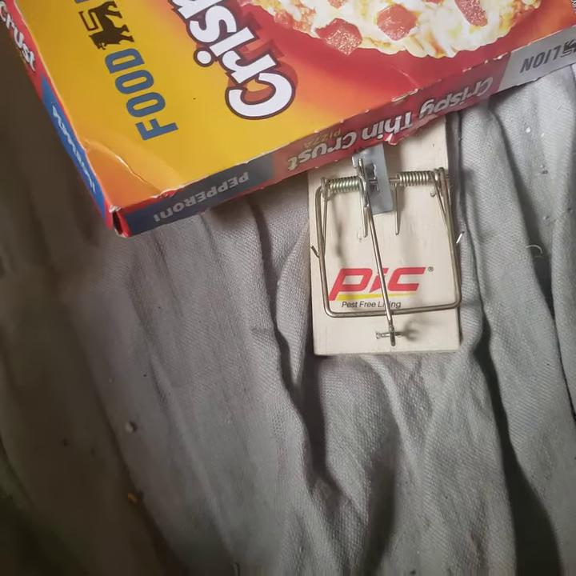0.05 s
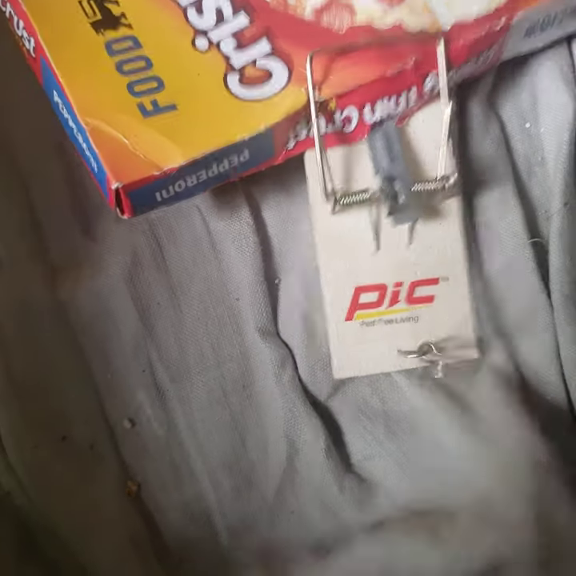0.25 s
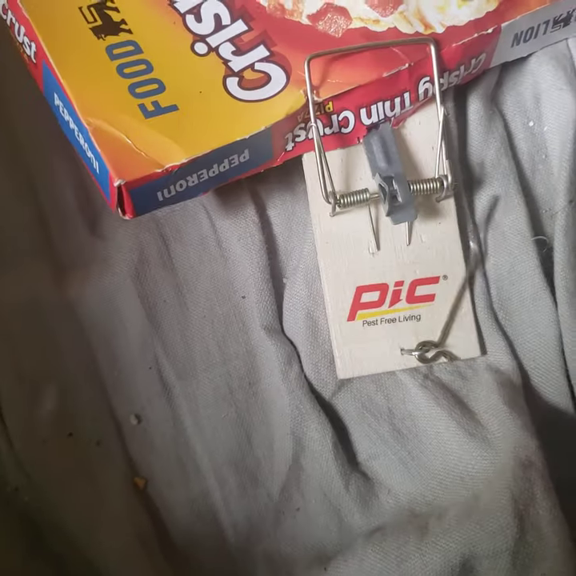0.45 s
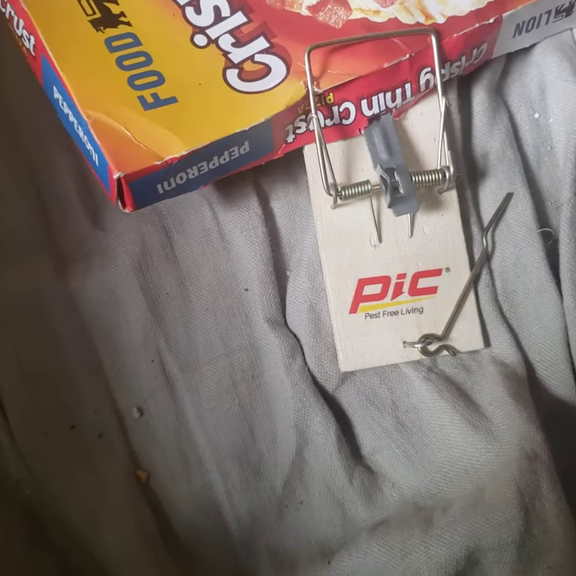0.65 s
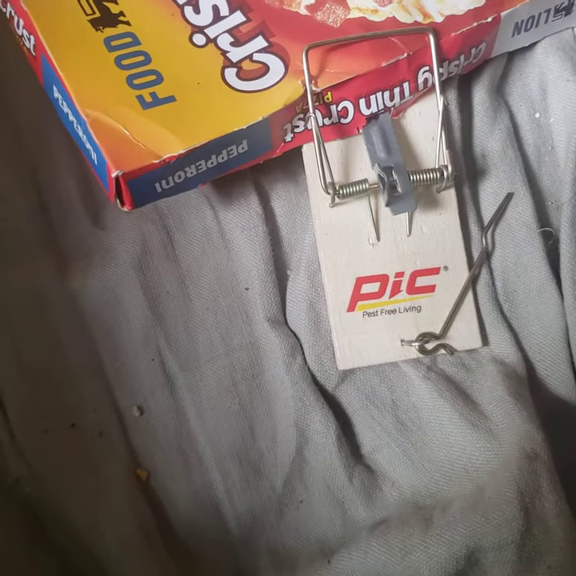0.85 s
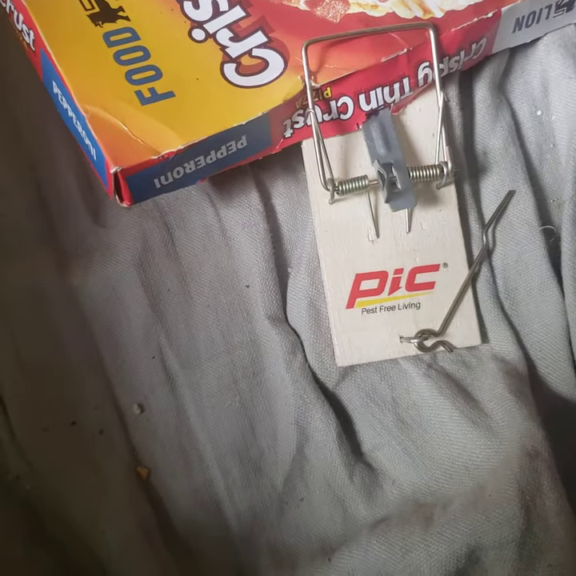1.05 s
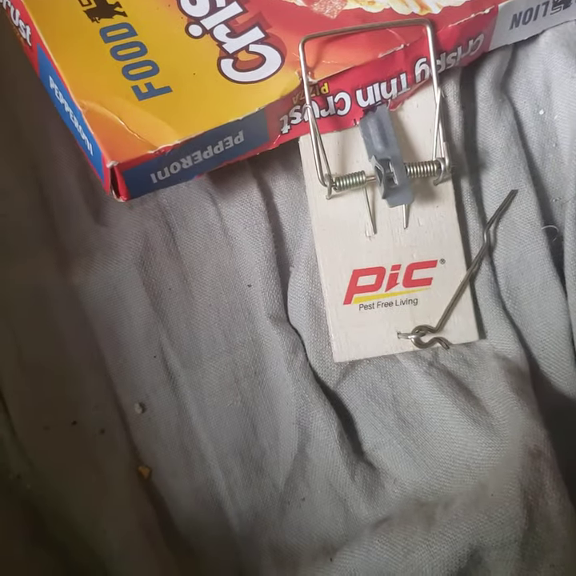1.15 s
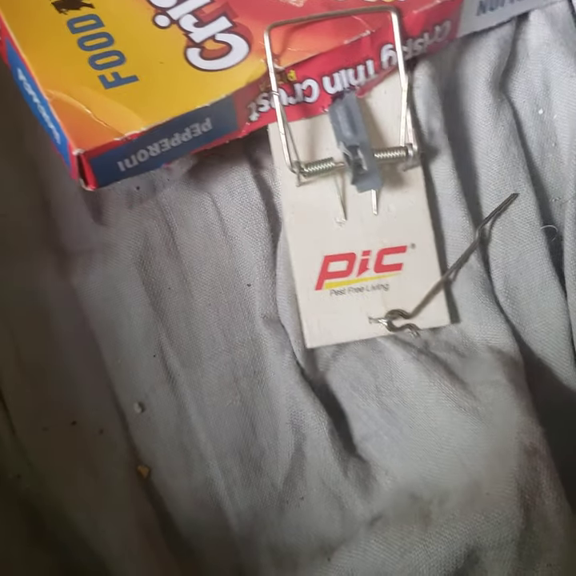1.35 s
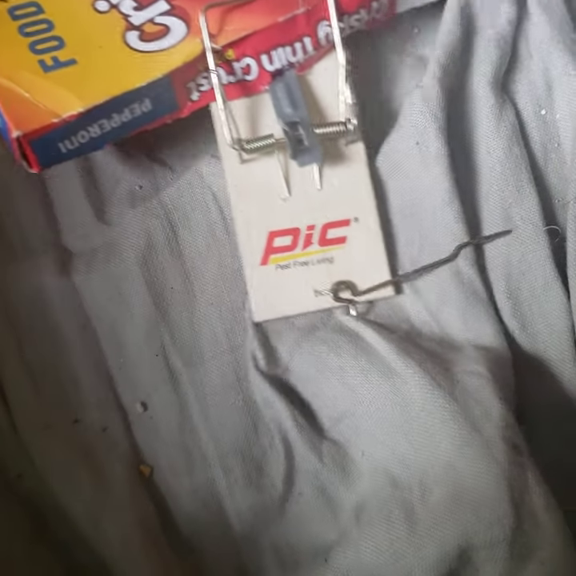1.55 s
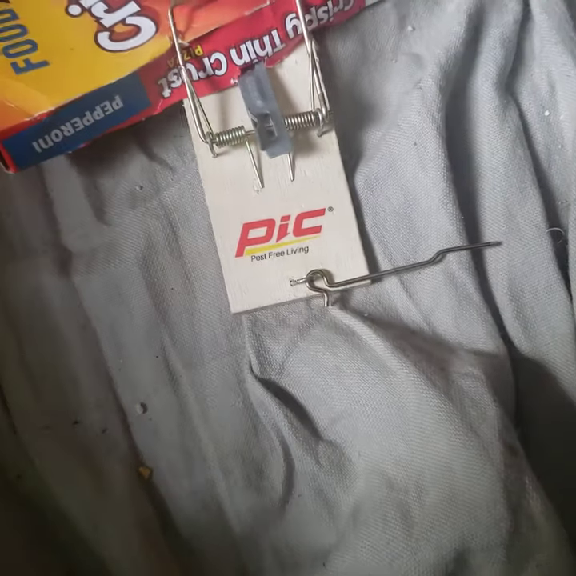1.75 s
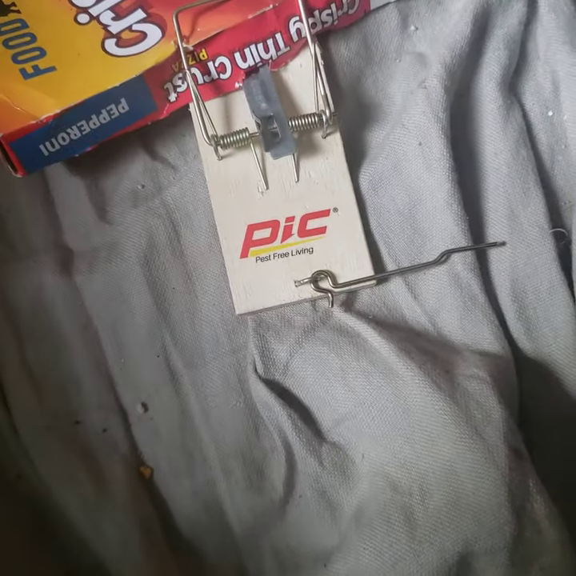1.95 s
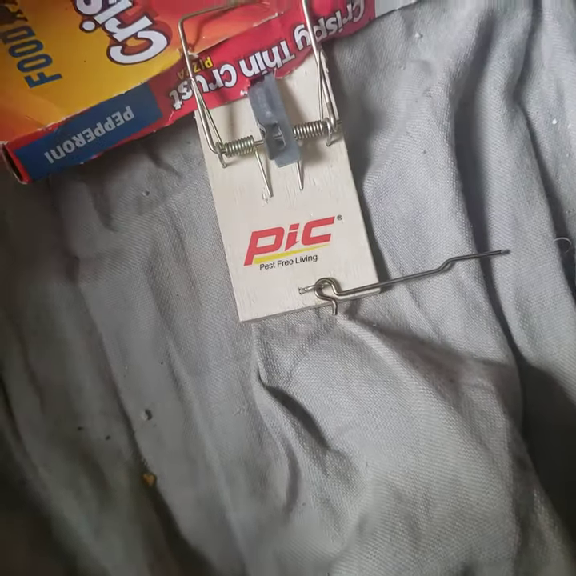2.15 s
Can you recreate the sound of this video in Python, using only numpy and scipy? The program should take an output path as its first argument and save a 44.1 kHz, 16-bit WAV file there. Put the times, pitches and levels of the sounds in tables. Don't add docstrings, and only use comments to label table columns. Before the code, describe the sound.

Sharp mousetrap snap up close, brief wire rattle, then faint cloth rustles over low room hum.

```python
import sys
import numpy as np
from scipy import signal
from scipy.io import wavfile

SR = 44100
rng = np.random.default_rng(int(sys.argv[2]) if len(sys.argv) > 2 else 0)


def unload_audio(sound):
    columns = np.transpose(np.atleast_2d(sound))
    steps = np.round(np.clip(columns, -1, 1) * 32767)
    wavfile.write(sys.argv[1], SR, steps.astype(np.int16))


def level_to_linear(level):
    exponent = np.asarray(level, float) / 20
    return 10 ** exponent


N = 97020
LAG_S = 0.00023


def rms_one(x):
    return x / np.sqrt(np.mean(x ** 2) + 1e-20)


def at_hz(points, hz):
    table_hz, value = np.transpose(points)
    return np.interp(np.log(hz), np.log(table_hz), value)


def ring(clicks, hz, t60):
    r, w = level_to_linear(-60 / (t60 * SR)), 2 * np.pi * hz / SR
    return signal.lfilter([0, np.sin(w)], [1, -2 * r * np.cos(w), r * r], clicks + 1e-18)


def fade(clicks, t60):
    return signal.lfilter([1], [1, -level_to_linear(-60 / (t60 * SR))], np.abs(clicks) + 1e-18)


def panned(db, pan_db):
    return level_to_linear(np.asarray(db) + np.outer([.5, -.5], pan_db))


def train(s, gains):
    out = np.zeros((2, N))
    for side in range(2):
        heard_s = np.asarray(s) + LAG_S * (1 - side)
        np.add.at(out[side], np.round(heard_s * SR).astype(int), gains[side])
    return out


def bands(spectrum):
    edges = 25.7 * 2 ** (np.arange(29) / 3)
    hz = np.sqrt(edges[1:] * edges[:-1])
    gain = level_to_linear(at_hz(spectrum, hz)) * (hz > spectrum[0][0] / 1.2)
    gain = gain / np.sqrt(np.sum(gain ** 2 * np.diff(edges)) / (SR / 2))
    return [(signal.butter(2, edges[k:k + 2], "band", fs=SR, output="sos"), hz[k], gain[k])
            for k in range(len(hz)) if gain[k] > 0]


def coloured(x, spectrum):
    return sum(g * signal.sosfilt(sos, x) * (-1) ** k for k, (sos, hz, g) in enumerate(bands(spectrum)))


def burst(clicks, spectrum, t60):
    alike, first_contact_db = .6, 8
    shared = rng.standard_normal(N)
    shared = np.array([np.roll(shared, int(LAG_S * SR)), shared])
    own = rng.standard_normal((2, N))
    grit = (np.sqrt(alike) * shared + np.sqrt(1 - alike) * own) * fade(clicks, t60)
    return coloured(grit + level_to_linear(first_contact_db) * clicks, spectrum)


# hz, likeness (0 to 1)
LIKENESS = [(60, .91), (130, .93), (290, .8), (640, .4), (1400, 0), (15000, 0)]


def diffuse(mid, side, hz):
    alike = at_hz(LIKENESS, hz)
    return np.sqrt((1 + alike) / 2) * mid + np.sqrt((1 - alike) / 2) * side * [[1], [-1]]


# hz, level_db (per Hz)
ROOM_NOISE = [(25, -33.5), (45, -16.5), (76, 2), (250, 0), (430, -5), (900, -5.5), (1500, -13),
              (2700, -15.5)]
# hz, level_db (per Hz)
HISS = [(2700, -19), (3300, -26.5), (5500, -29), (7000, -47.5), (8500, -48.5), (10500, -43), (13000, -40),
        (16500, -40)]
# pitch_hz, width_hz, level_db
HUMS = [(85, 17, -9.5), (182, 35, -6), (270, 25, -9), (375, 29.3, -11.5), (585.4, 34, -13.5),
        (826, 40, -15)]
# time_s, gain_db
RECORDER_GAIN = [(0, 13), (.04, 13.5), (0.216, 14.5), (0.261, 15), (0.399, 5), (.55, 4), (1.2, 3.5),
                 (1.9, 3.5), (2.2, 3)]


def room():
    white, noise = rng.standard_normal((2, 2, N + SR)), 0
    for k, (sos, hz, g) in enumerate(bands(list(ROOM_NOISE) + list(HISS)[1:])):
        mid, side = signal.sosfilt(sos, white[k % 2])[:, SR:]
        noise = noise + g * diffuse(mid, side, hz)
    noise = rms_one(noise)
    for hz, width_hz, level_db in HUMS:
        hum = ring(rng.standard_normal(N + SR), hz, 3.4 / width_hz)[SR:]
        noise = noise + level_to_linear(level_db) * rms_one(hum)
    s, gain_db = np.transpose(RECORDER_GAIN)
    return noise * level_to_linear(-63 + np.interp(np.arange(N) / SR, s, gain_db))


def swell(at, length_s, db):
    return level_to_linear(db) * np.exp(-(2 * (np.arange(N) / SR - at) / length_s) ** 2)


# centre_s, length_s, pitch_hz, level_db
SQUEAKS = [
    (.785, .03, 11300, -91),
    (1.518, .11, 6650, -83),
    (1.63, .07, 7300, -94),
]


def squeaks():
    out = np.zeros((2, N))
    for at, length_s, hz, db in SQUEAKS:
        out += swell(at, length_s, db) * rms_one(ring(rng.standard_normal((2, N)), hz, .03))
    return out


# centre_s, length_s, level_db
SLIDES = [
    (0.776, 0.051, -85),
    (1.222, .09, -76),
    (1.362, 0.068, -76.5),
    (1.5, 0.1, -76),
    (1.853, 0.068, -90.5),
    (2.0, 0.067, -83),
]
# hz, level_db (per Hz)
CLOTH = [(1500, -5.5), (3000, 2.5), (5200, -3.5), (6600, 1), (7500, -16.5), (9500, -13.5), (12500, -23),
         (16500, -16.5)]


def cloth():
    sliding = sum(swell(at, length_s, db) for at, length_s, db in SLIDES)
    return coloured(rng.standard_normal((2, N)) * (sliding + 1e-12), CLOTH)


# pitch_hz, level_db, t60_s
WIRE = [(2400, -15, .08), (3150, -19, .035), (5350, -13, .055), (5620, -17, .045), (6200, -25, .03),
        (10300, -28, .025), (12500, -34, .025), (14200, -32, .025)]


def touches(rows, spectrum, t60, wire_db, ring_db):
    s, db, ring_hz, pan_db = np.transpose(rows)
    gains = panned(db, pan_db)
    clicks = train(s, gains)
    out = level_to_linear(-1.5) * burst(clicks, spectrum, t60)
    t = np.arange(int(.05 * SR)) / SR
    for at, hz, g in zip(s, ring_hz, gains.T):
        own_ring = level_to_linear(ring_db - 60 * t / .013) * np.sin(2 * np.pi * hz * t)
        for side in range(2):
            i = int((at + LAG_S * (1 - side)) * SR)
            out[side, i:i + len(t)] += g[side] * own_ring
    luck_db = rng.normal(0, 1.4, (len(s), len(WIRE)))
    for k, (hz, level_db, mode_t60) in enumerate(WIRE):
        out += ring(train(s, gains * level_to_linear(level_db + wire_db + luck_db[:, k])), hz, mode_t60)
    return clicks, out


# start_s, level_db (peak), pitch_hz, left_right_db
RUSTLE = [(1.2015, -65, 2380, -4), (1.23, -69, 1818, -11), (1.33, -60.5, 1930, -6),
          (1.372, -64.5, 2020, -1), (1.4755, -55, 2668, 5), (1.962, -57.5, 2120, -6),
          (1.9795, -46, 1400, 0), (1.9931, -42.5, 2772, -5), (2.0005, -55, 2590, -8),
          (2.0085, -49.5, 2200, 0), (2.103, -81, 1850, 3)]
# hz, level_db (per Hz)
BRUSH = [(290, -43), (500, 1), (1450, 1.5), (2270, 1), (2820, 0), (4400, -9), (6000, -9)]


def sleeve():
    clicks, brushes = touches(RUSTLE, BRUSH, t60=.016, wire_db=-34, ring_db=4)
    return signal.sosfilt(signal.butter(8, 4700, fs=SR, output="sos"), brushes)


# hz, level_db (per Hz)
TAIL = [(50, -6), (304, 2.5), (573, -20), (1330, -0.5), (5460, -10.5), (8950, -27.5), (11000, -20.5),
        (15500, -23), (16500, -40)]
# hz, t60_s
TAIL_T60 = [(60, .16), (160, .09), (300, 0.059), (700, .16), (2000, 0.16), (5000, 0.15), (12000, 0.2)]


def reflections(clicks):
    late = np.roll(clicks, int(.0083 * SR), axis=1)
    white, out = rng.standard_normal((2, 2, N)), 0
    for k, (sos, hz, g) in enumerate(bands(TAIL)):
        envelope = np.sqrt(fade(late ** 2, at_hz(TAIL_T60, hz) / 2))
        out = out + g * signal.sosfilt(sos, diffuse(*white[k % 2], hz) * envelope)
    return out


# start_s, level_db (peak), pitch_hz, left_right_db
RATTLE = [(.3078, -46, 2370, -3), (.3152, -47, 2400, -1), (.3197, -27.5, 2400, 5.5), (.3235, -41, 2780, -4),
          (.331, -46, 6000, 4), (.3363, -35, 5620, 0), (.343, -39, 5300, 7), (.3515, -44.5, 5600, -10),
          (.3586, -27.5, 1890, 6), (.363, -39, 2080, -16), (.369, -43, 5600, -13), (.372, -67, 2370, -13.5),
          (.3812, -40, 5600, -3), (.3918, -42, 5770, 2), (.398, -47.5, 2290, 20), (.4098, -41.5, 5460, 0),
          (.4165, -56, 5600, -15), (.4326, -38, 3460, 6), (.4345, -40.5, 5450, 1),
          (.4398, -47.5, 3200, -16), (.4454, -55.5, 2370, -4), (.4662, -44.5, 970, 11),
          (.4682, -38, 2720, -13.5), (.4695, -37.5, 5130, -0.5), (.4706, -45.5, 2700, 11),
          (.4835, -60, 5600, -6), (.4892, -45, 5600, 4), (.5071, -45, 3240, -4), (.5155, -58, 4050, -11),
          (.5267, -45.5, 6080, 8), (.591, -65.5, 6470, -0.5)]
# hz, level_db (per Hz)
TICK = [(550, -24), (950, -0.5), (2540, 5), (3400, 6.5), (4050, -17), (5350, 8), (7710, -9), (15300, -14),
        (16500, -36)]


def wire_rattle():
    return touches(RATTLE, TICK, t60=.014, wire_db=0, ring_db=3)


# start_s, level_db, pitch_hz, t60_s, left_right_db
THUDS = [
    (0.2346, -17.5, 75, .08, 3),
    (0.28, -39, 65.6, 0.072, 1),
    (0.296, -37.5, 81, 0.13, 6),
    (.395, -47.5, 81.5, 0.19, 1.5),
    (0.468, -52, 85, .11, 0),
    (1.981, -55, 85, .26, -1),
    (2.156, -50.5, 112, 0.21, 0),
]


def mattress_thuds():
    out = np.zeros((2, N))
    for at, db, hz, t60, pan_db in THUDS:
        out += ring(-train([at], panned([db], [pan_db])), hz, t60)
    return out


# pitch_hz, left_db, right_db, right_lag_ms, t60_ms
BASE = [(200, -20.5, -17, 0, 49), (272, -14.5, -10.5, .3, 70), (314.7, -21.5, -20, 0.016, 54),
        (785, -12, -18, 0.41, 43), (898, -11, -9, .3, 78), (1071, -2.5, -9, 0.68, 36),
        (1290, -20, -17.5, 0.15, 50), (1665, -14.5, -17, .4, 70), (1900, -16, -11, .3, 50),
        (2380, -16.5, -15, 0.49, 60), (2620, -13, -6.5, .5, 55), (3021, -13.5, -13, 0.24, 50),
        (4390, -10.5, -13, 0, 25), (5400, -19, -17, 0.26, 21)]


def base(at, gains):
    swell_s, free_s, damp_s, damp_db, damp_from_hz = .0006, .0042, .0024, -15.5, 500
    out = np.zeros((2, N))
    i = int(at * SR)
    for hz, left_db, right_db, lag_ms, t60_ms in BASE:
        t = np.arange(int(.12 * SR)) / SR - np.array([[0], [lag_ms / 1000]])
        t = np.clip(t, 0, None)
        damping_db = damp_db * np.clip((t - free_s) / damp_s, 0, 1) * (hz > damp_from_hz)
        shape = np.minimum(t / swell_s, 1) * level_to_linear(damping_db - 60 * t / (t60_ms / 1000))
        level = gains[:, None] * level_to_linear([[left_db], [right_db]])
        out[:, i:i + t.shape[1]] += level * shape * np.sin(2 * np.pi * hz * t)
    return out


# start_s, level_db, push_direction, left_right_db
BLOWS = [
    (0.2219, -35.5, 1, 1),
    (0.2261, -35, -1, -1),
    (0.2303, -2.5, -1, 2.5),
    (0.2401, -11, -1, 0),
    (0.2536, -19.5, -1, -1),
]
# start_s, level_db, left_right_db
SPLINTERS = [
    (0.2316, -10, 6.5),
    (0.2297, -8, 3.5),
    (0.2313, -6, -2),
    (.2425, -9.5, -3.5),
    (0.245, -17.5, -1),
    (.261, -20.5, 1.5),
]
# hz, level_db (per Hz)
CRACK = [(650, -30.5), (900, -13.5), (1500, -10), (2700, 5.5), (3700, -3.5), (4700, -3), (7500, -20),
         (13000, -20)]


def snap():
    s, db, push, pan_db = np.transpose(BLOWS)
    gains = panned(db, pan_db) * np.sign(push)
    wood = sum(base(at, g) for at, g in zip(s, gains.T))
    splinter_s, splinter_db, splinter_pan_db = np.transpose(SPLINTERS)
    clicks = train(s, gains * level_to_linear(-2)) + train(splinter_s, panned(splinter_db, splinter_pan_db))
    return clicks, wood + level_to_linear(-11.5) * burst(clicks, CRACK, t60=.012)


def scene():
    background = room() + squeaks() + cloth() + sleeve()
    rattle_clicks, rattle = wire_rattle()
    snap_clicks, trap = snap()
    echoes = reflections(level_to_linear(-18.5) * snap_clicks + level_to_linear(-17) * rattle_clicks)
    return background + echoes + rattle + mattress_thuds() + trap


def roll_off(x):
    return signal.sosfilt(signal.butter(12, 16640, fs=SR, output="sos"), x)


def record(dry):
    dip_hz, dip_width_hz, dip_share = 8055, 2000, 0.67
    b, a = signal.iirpeak(dip_hz, dip_hz / dip_width_hz, fs=SR)
    x = dry - dip_share * signal.lfilter(b, a, dry)
    x = 1.795 * np.tanh(x / 2.415)
    x = signal.sosfilt(signal.butter(2, 40, "high", fs=SR, output="sos"), x)
    mix = signal.sosfilt(signal.cheby2(12, 70, 17000, fs=SR, output="sos"), x)
    return roll_off(mix)


dry = scene()
out = record(dry)
unload_audio(out)
```